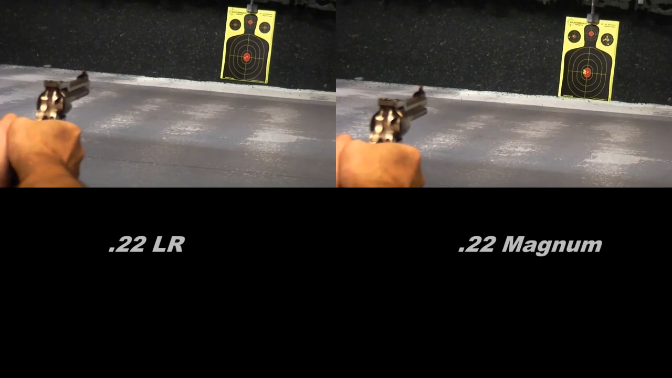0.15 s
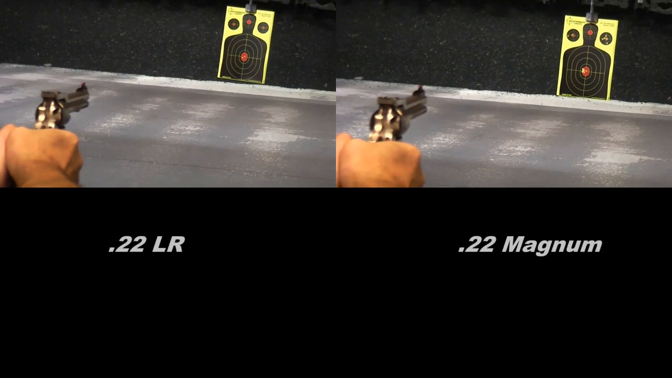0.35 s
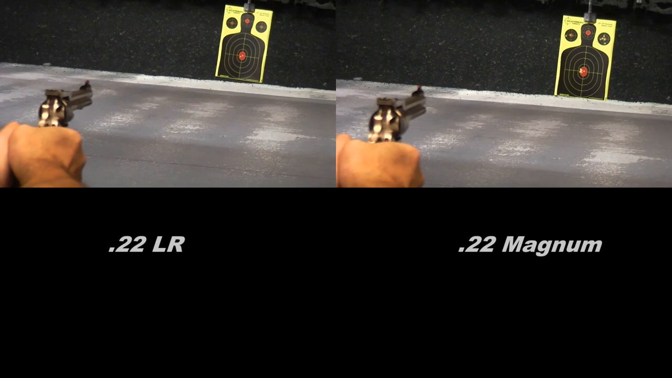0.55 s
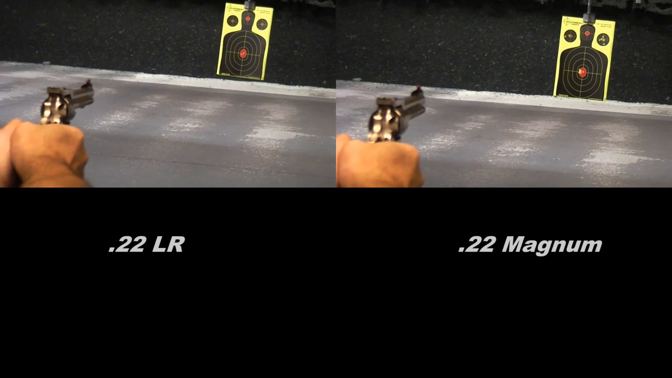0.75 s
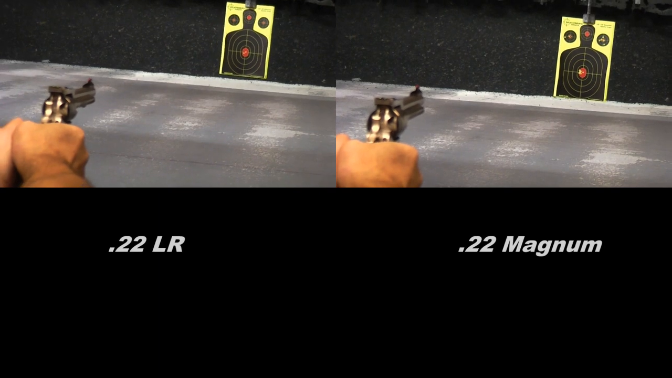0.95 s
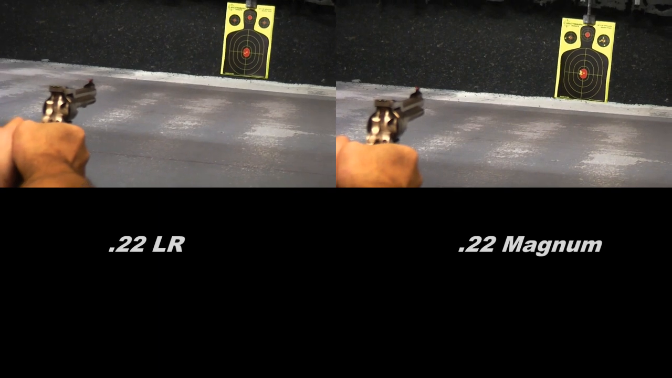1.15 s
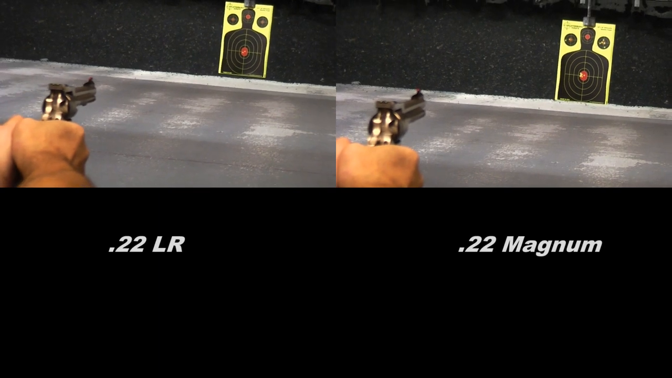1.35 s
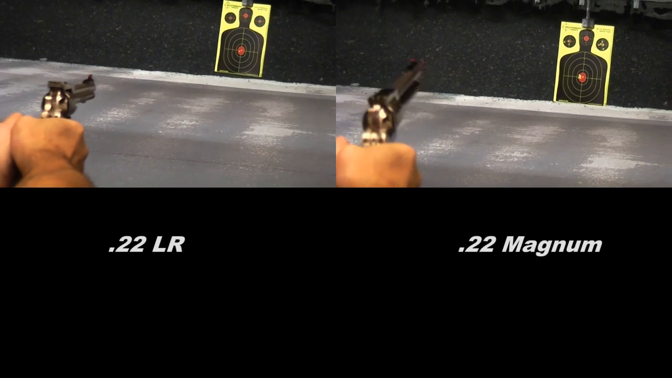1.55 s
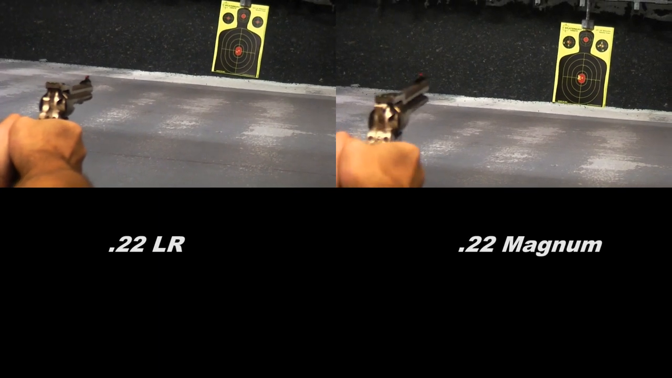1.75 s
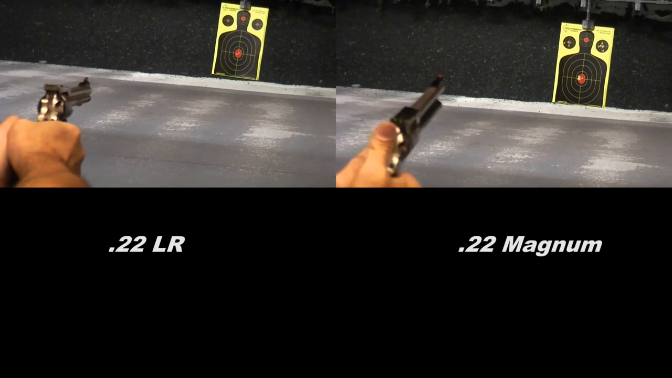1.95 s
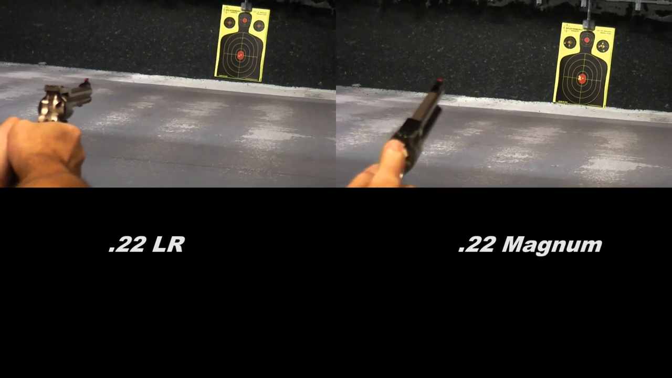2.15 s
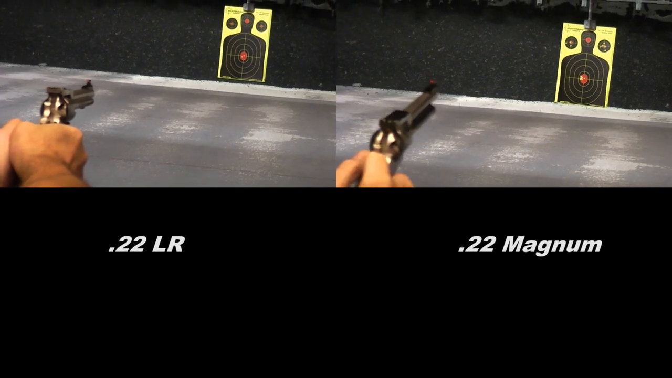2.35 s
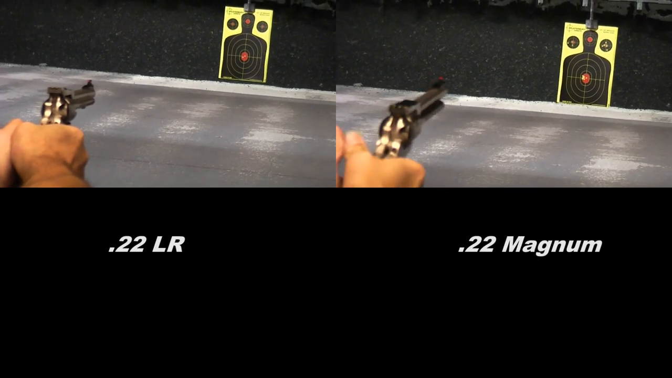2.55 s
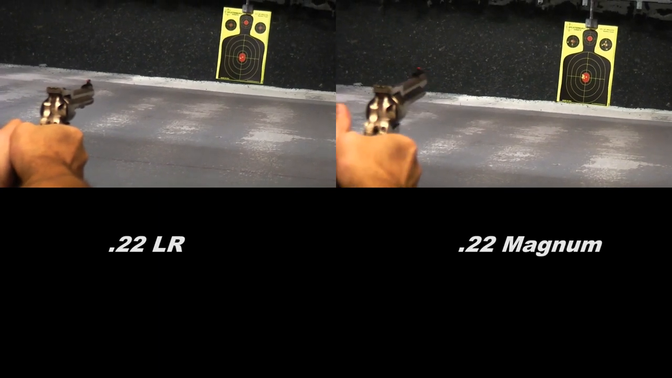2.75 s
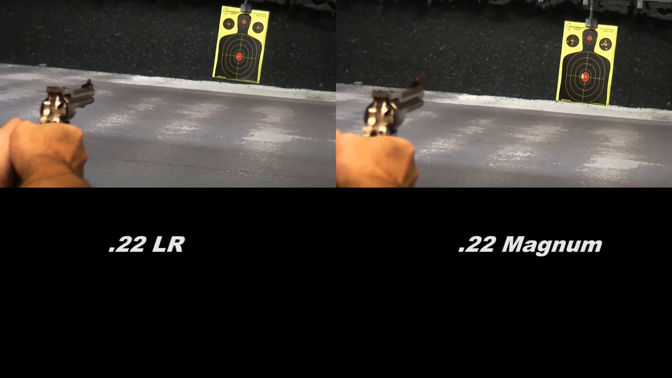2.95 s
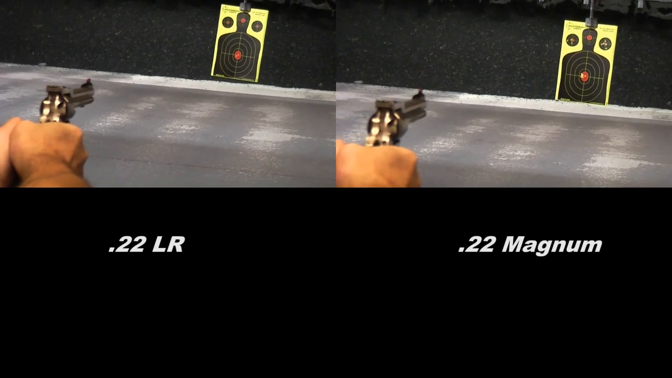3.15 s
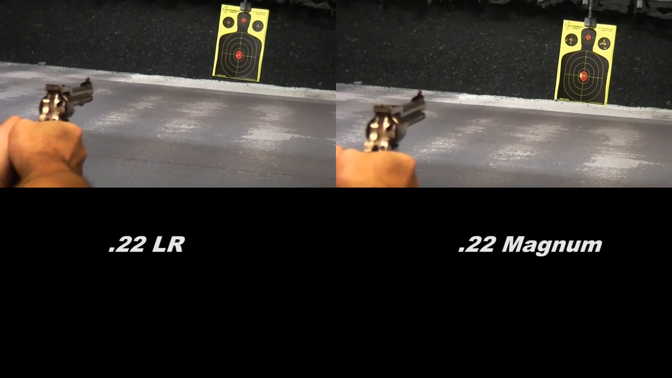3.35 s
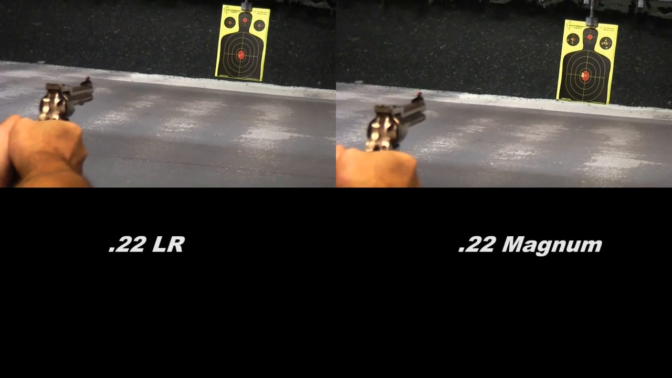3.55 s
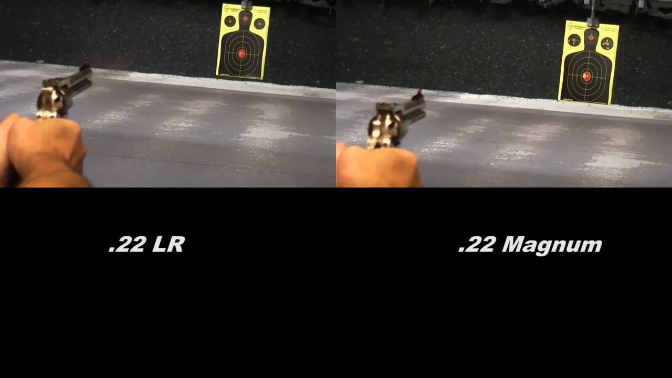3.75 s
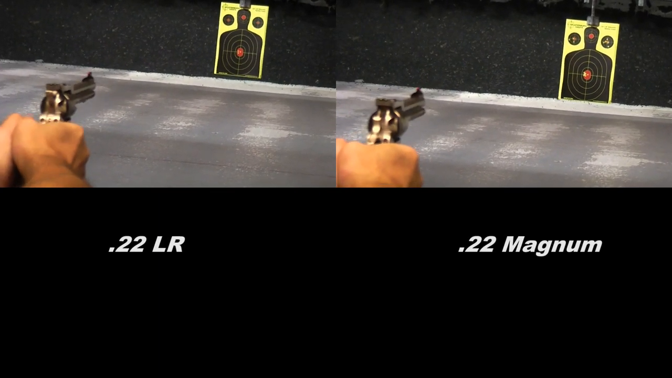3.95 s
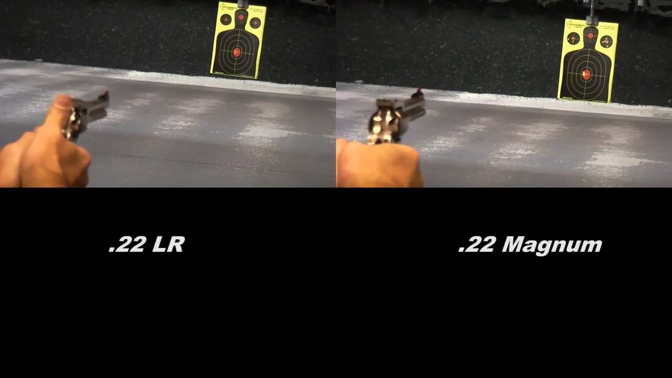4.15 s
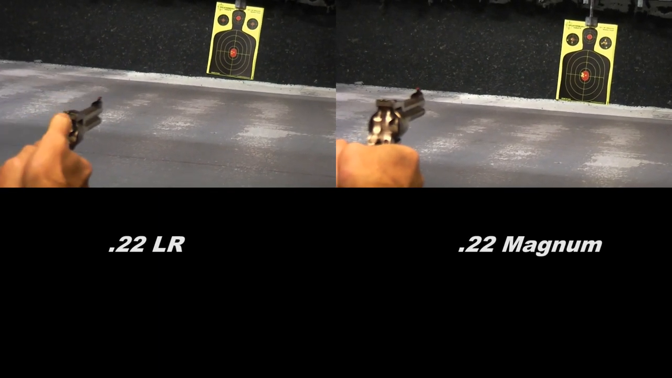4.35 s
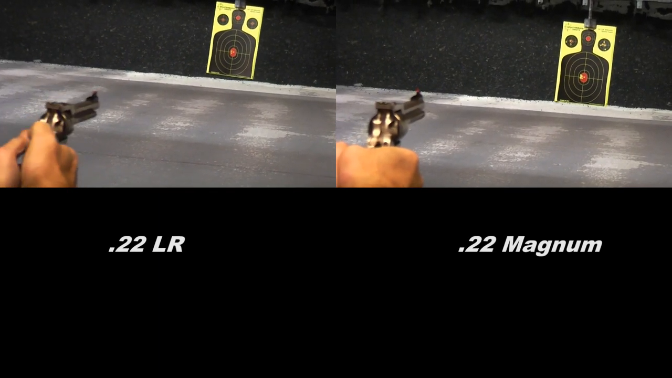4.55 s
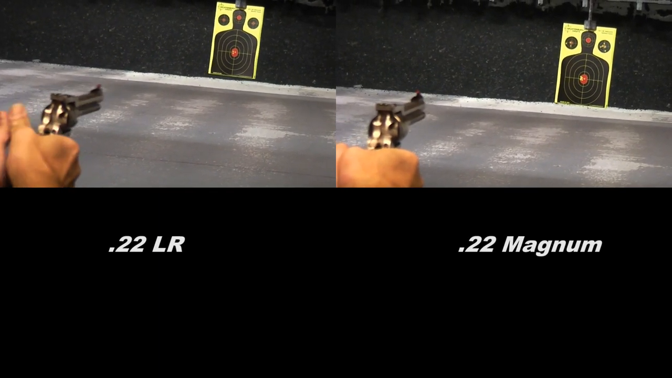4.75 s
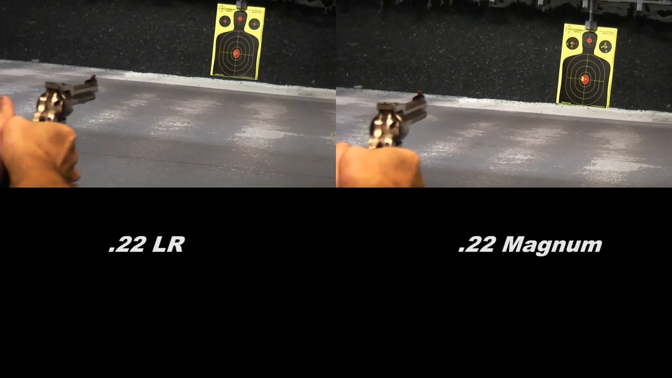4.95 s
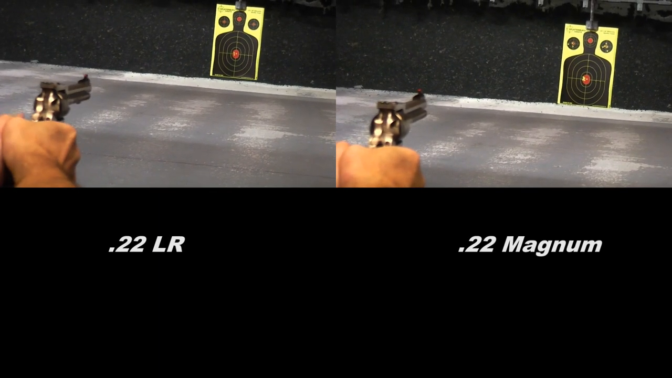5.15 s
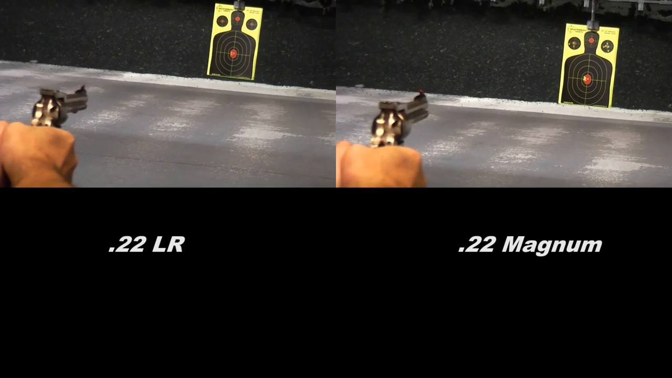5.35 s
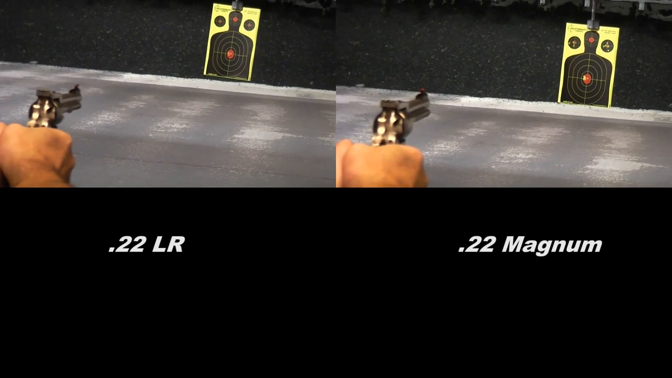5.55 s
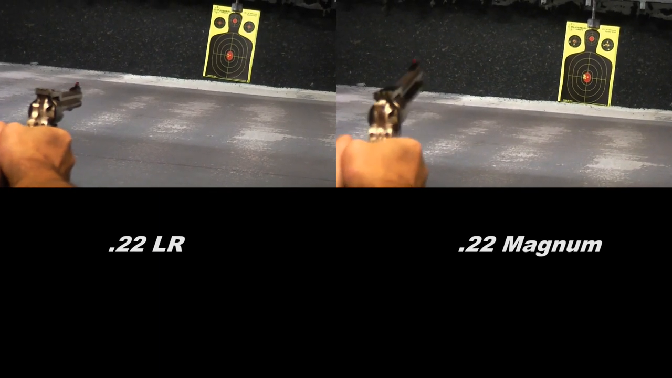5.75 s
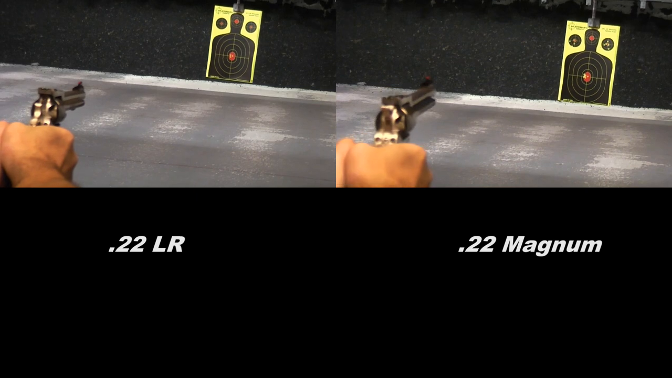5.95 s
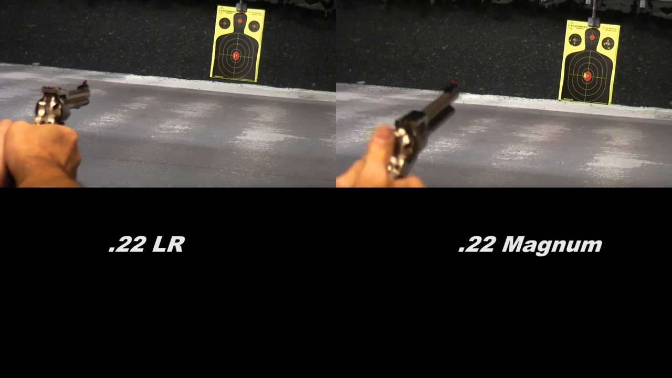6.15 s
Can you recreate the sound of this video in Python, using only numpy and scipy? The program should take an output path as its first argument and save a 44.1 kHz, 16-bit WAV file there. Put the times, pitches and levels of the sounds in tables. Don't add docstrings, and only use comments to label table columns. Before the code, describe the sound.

Loud revolver shots, dull booms mixed with bright cracks, fire unevenly in a hard indoor range, tails overlapping, with metallic clicks between.

```python
import sys
import numpy as np
from scipy import signal
from scipy.io import wavfile
from scipy.ndimage import uniform_filter1d

SR = 44100
rng = np.random.default_rng(int(sys.argv[2]) if len(sys.argv) > 2 else 0)


def amp(db):
    return 10 ** (np.asarray(db, float) / 20)


def write(x):
    x = np.atleast_2d(x).T
    wavfile.write(sys.argv[1], SR, np.round(np.clip(x, -1, 1) * 32767).astype(np.int16))


N = 277385

# (time [s], blast level [dB], gain back after [s], drop at that moment [dB])
FAR_SHOTS = [
    (-.82, -2, .55, 4.5),
    (.613, -2, .55, 3),
    (1.902, -2, .54, 4),
    (3.327, -2, .46, 8),
    (4.808, -2, .44, 5),
    (6.183, -2, .55, 3),
]
NEAR_SHOTS = [
    (1.62, -1, .45, 4),
    (5.794, -1, .5, 3),
]
OTHER_SHOTS = [
    (2.692, -2.5, .535, 8.5),
]
CLOSE_SHOTS = [
    (3.815, -5, .35, 3.5),
]

# (frequency [Hz], density [dB per Hz])
FAR_BLAST = [(18, -53), (30, -23), (410, -5), (467, -2), (532, -4), (606, -1), (1260, -10), (1360, -14),
             (5310, -21), (15500, -44)]
NEAR_BLAST = [(18, -59), (30, -29), (102, -7), (177, -11), (237, 0), (443, -8), (561, -5), (2130, -10),
              (3780, -9), (15500, -32)]
CLOSE_BLAST = [(200, -13), (700, -9), (1500, -5), (2100, -1), (3500, -3), (5900, -6), (15500, -24)]
# (frequency [Hz], density [dB per Hz])
TAIL = [(30, -46), (100, -16), (165, -13), (260, -1), (420, -2), (600, -1), (850, 2), (1100, -3.5),
        (1450, -4.5), (1900, -11), (3000, -12), (5700, -17), (9000, -21), (11500, -29), (14000, -66)]
# (frequency [Hz], T60 [s])
TAIL_T60 = [(60, 2.5), (250, 1.4), (500, 1.3), (1000, 1.5), (3000, 1.33), (6000, 1.05), (11000, .62)]
# (time after blast [s], climb [Hz/s], level [dB])
BOOM = [
    (.004, 13000, 0),
    (.062, 14000, -1),
    (.087, 6500, -4),
    (.145, 6000, -13),
]
# (frequency [Hz], correlation [-1 to 1])
FAR_LIKENESS = [(60, -.1), (180, .05), (320, .85), (600, .86), (1650, .62), (4970, .72), (15000, .4)]
NEAR_LIKENESS = [(60, 0.17), (180, 0.14), (550, 0.55), (1650, 0.54), (4970, 0.59), (15000, 0.27)]
TAIL_LIKENESS = [(60, 0.05), (180, .3), (550, .8), (1650, .72), (4970, .7), (15000, .25)]
# (frequency [Hz], density [dB per Hz])
AIR = [(25, -32), (42, -13), (80, -13), (125, 0), (165, -4), (200, -14), (300, -12), (420, -22), (780, -12),
       (1100, -18), (1600, -31), (3000, -36), (7000, -47), (11000, -66)]
AIR_DB = -43
# (time [s], peak level [dB], centre frequency [Hz], T60 [s])
CLICKS = [(.06, -44, 5000, .15), (.065, -54, 9500, .12), (.315, -46, 4400, .14), (.318, -60, 11500, .12),
          (1.401, -50, 5000, .03), (2.366, -31, 10000, .03), (2.426, -33, 9000, .05),
          (4.42, -35, 7600, .05), (4.572, -34, 3500, .03), (4.645, -37, 9500, .04), (5.26, -43, 11000, .08),
          (5.33, -43, 10000, .08), (5.44, -46, 7000, .06)]
# (time [s], length [s], level [dB])
RATTLE = [
    (4.22, .57, -40.5),
    (5.25, .2, -56),
]
# (frequency [Hz], level [dB], T60 [s])
STEEL = [(1850, 1, .022), (2750, 3, .03), (3300, -2, .02), (4500, -2, .03), (4950, -3, .025),
         (5450, -5, .02), (6400, -4, .02), (7150, -1, .03), (7650, -4, .02), (8600, -6, .012),
         (9500, -6, .01), (11100, -8, .008), (13500, -12, .006)]

EDGES = 28 * 2 ** np.arange(0, 9.3, .4)
CENTRES = np.sqrt(EDGES[:-1] * EDGES[1:])
WHOLE = np.ones((1, len(CENTRES)))

LEAD_S, RING_S = .04, 1.5
BOOM_LOW_HZ, BOOM_TOP_HZ, BOOM_SAG_DB_PER_S = 340, 880, 70
RATTLE_RISE_S, RATTLE_SAG_DB_PER_S, RATTLE_STOP_S = .2, 12, .09
TOP_OPEN_HZ, TOP_SHUT_HZ, TOP_CLOSE_S, TOP_EDGE_HZ = 15800, 9900, .2, 700
DUCK_DB = 5


def rms_one(x):
    return x / np.sqrt(np.mean(x ** 2) + 1e-20)


def filtered(x, order, hz, kind="low"):
    return signal.sosfilt(signal.butter(order, hz, kind, fs=SR, output="sos"), x)


def fade(size, t60):
    return np.exp(np.arange(size, dtype=np.float32) * np.float32(-np.log(1000) / (t60 * SR)))


def at_hz(points, hz):
    points = np.array(points)
    return np.interp(np.log(hz), np.log(points[:, 0]), points[:, 1])


def noise_bank():
    white = rng.standard_normal((2, 2, N // 2 + 1))
    bands = [filtered(white[k % 2], 2, [low, high], "band")
             for k, (low, high) in enumerate(zip(EDGES, EDGES[1:]))]
    return np.stack(bands, axis=1).astype(np.float32)


def coloured(bank, spectrum, likeness, groups):
    alike = np.clip(at_hz(likeness, CENTRES), -1, 1)
    gain = amp(at_hz(spectrum, CENTRES))
    power = np.sum(gain ** 2 * np.diff(EDGES)) / SR * 4
    gain = groups * gain / np.sqrt(power)
    mid = (gain * np.sqrt(1 + alike)).astype(np.float32) @ bank[0]
    side = (gain * np.sqrt(1 - alike)).astype(np.float32) @ bank[1]
    return np.stack([mid + side, mid - side], axis=1)


def tail_bands(bank):
    nodes = np.log(np.array(TAIL_T60)[:, 0])
    shares = np.array([np.interp(np.log(CENTRES), nodes, row) for row in np.eye(len(nodes))])
    return filtered(coloured(bank, TAIL, TAIL_LIKENESS, shares), 2, 11000)


def echoes(blast, tails, blast_t60, tail_db, slap_s, slap_db, swell_s):
    size = int(RING_S * SR)
    start, later = rng.integers(SR // 8, N // 2 - size, 2)
    tail = sum(x[:, later:later + size] * fade(size, t60) for x, (hz, t60) in zip(tails, TAIL_T60))
    tail = tail * (1 - .8 * fade(size, swell_s))
    wash = fade(size, blast_t60)
    back = int((slap_s + LEAD_S) * SR)
    wash[back:] += amp(slap_db) * fade(size - back, blast_t60)
    return blast[0, :, start:start + size] * wash + amp(tail_db) * tail


def boom(size, rough_hz):
    s, climb, db = np.transpose(BOOM)
    t = np.arange(SR // 3) / SR - LEAD_S
    echo = np.maximum(np.searchsorted(s, t) - 1, 0)
    since = np.maximum(t - s[echo], 0)
    hz = np.minimum(BOOM_LOW_HZ + climb[echo] * since, BOOM_TOP_HZ)
    hz = uniform_filter1d(hz, size=200)
    level_db = db[echo] - BOOM_SAG_DB_PER_S * since - 300 * np.maximum(t - .17, 0)
    level_db = uniform_filter1d(level_db, size=200)
    wobble = rms_one(filtered(rng.standard_normal((4, len(t))), 2, rough_hz))
    phase = 2 * np.pi * np.cumsum(hz) / SR + .7 * wobble[0] + .4 * wobble[2:]
    out = np.zeros((2, size))
    out[:, :len(t)] = amp(level_db + 3.5 * wobble[1]) * np.sin(phase)
    return out


def ceiling(x, since):
    hz, s, z = signal.stft(x, SR, nperseg=1024)
    late = np.interp(s, np.arange(len(since)) / SR, since)
    edge = TOP_SHUT_HZ + (TOP_OPEN_HZ - TOP_SHUT_HZ) * np.exp(-late / TOP_CLOSE_S)
    edge = edge + 550 * rng.standard_normal(len(s))
    dull_db = -6 * np.clip((hz[:, None] - 8500) / 5000, 0, 1) * (1 - np.exp(-late / .06))
    cut_db = -40 * np.clip((hz[:, None] - edge) / TOP_EDGE_HZ, 0, 2)
    return signal.istft(z * amp(dull_db + cut_db), SR)[1][:, :x.shape[1]]


def camera(sound, shot, build_s, hold_s, dive_s, dive_db, tops):
    s, blast_db, back_s, drop_db = shot
    t = np.arange(sound.shape[1]) / SR - LEAD_S
    gain_db = np.interp(t, [-LEAD_S, -build_s, 0, hold_s, hold_s + dive_s, back_s, back_s + .06],
                        [-56, -36, 0, 0, -dive_db, 0, -drop_db])
    side_db = np.array([[.3], [-.3]])
    top = np.array(tops)[:, None]
    loud = sound * amp(blast_db + gain_db + side_db) / top
    clipped = top * loud / np.sqrt(np.sqrt(1 + (loud * loud) ** 2))
    clipped = ceiling(clipped, np.maximum(t - .75 * hold_s, 0))
    out = np.zeros((2, N))
    at = round((s - LEAD_S) * SR)
    part = clipped[:, max(-at, 0):N - at]
    out[:, max(at, 0):max(at, 0) + part.shape[1]] = part
    return out


def far_gun(far, near, tails):
    same = echoes(far, tails, blast_t60=.36, tail_db=5.5, slap_s=.1, slap_db=-12, swell_s=.2)
    same = same + amp(3) * boom(same.shape[1], rough_hz=190)
    out = 0
    for shot in FAR_SHOTS:
        change = echoes(near, tails, blast_t60=.45, tail_db=5, slap_s=.098, slap_db=-6, swell_s=.2)
        out = out + camera(same + amp(-11) * change, shot, build_s=.024, hold_s=.05,
                           dive_s=.11, dive_db=9.5, tops=[.45, .35])
    return out


def ventilation(bank):
    air = coloured(bank, AIR, TAIL_LIKENESS, WHOLE)[0]
    return amp(AIR_DB) * np.hstack([air[:, ::-1], air])[:, :N]


def ring(clicks, hz, t60):
    r = amp(-60 / (max(t60, .0005) * SR))
    w = 2 * np.pi * hz / SR
    return signal.lfilter([0, np.sin(w)], [1, -2 * r * np.cos(w), r * r], clicks + 1e-18)


def hammer_clicks():
    size = 4000
    out = np.zeros(N)
    for s, db, hz, t60 in CLICKS:
        burst = rng.standard_normal(size) * fade(size, t60)
        tick = ring(burst, hz, t60=.002)
        at = round(s * SR)
        out[at:at + size] += amp(db) * tick / np.abs(tick).max()
    return out * amp(np.array([[.6], [-.6]]))


def ducked(x, after_s):
    s = min(row[0] for row in FAR_SHOTS if row[0] > after_s)
    return x * amp(np.interp(np.arange(N) / SR - s, [-.015, 0], [0, -DUCK_DB]))


def near_gun(near, tails):
    out = 0
    for shot in NEAR_SHOTS:
        sound = echoes(near, tails, blast_t60=1, tail_db=.5, slap_s=.115, slap_db=-7, swell_s=1.4)
        heard = camera(sound, shot, build_s=.023, hold_s=.12, dive_s=.13, dive_db=6.5, tops=[.42, .38])
        out = out + ducked(heard, shot[0])
    return out


def other_gun(far, tails):
    out = 0
    for shot in OTHER_SHOTS:
        sound = echoes(far, tails, blast_t60=.6, tail_db=7.7, slap_s=.11, slap_db=-9, swell_s=.2)
        sound = sound + amp(3) * boom(sound.shape[1], rough_hz=220)
        out = out + camera(sound, shot, build_s=.018, hold_s=.09, dive_s=.11, dive_db=9, tops=[.5, .36])
    return out


def close_gun(bank, tails):
    crack = coloured(bank, CLOSE_BLAST, NEAR_LIKENESS, WHOLE)
    lane = .45 * tails + .75 * filtered(tails, 1, 500, "high")
    out = 0
    for shot in CLOSE_SHOTS:
        sound = echoes(crack, lane, blast_t60=.6, tail_db=1.5, slap_s=.125, slap_db=-16, swell_s=.6)
        out = out + camera(sound, shot, build_s=.005, hold_s=.04, dive_s=.07, dive_db=6.5, tops=[.4, .36])
    return out


def cylinder_rattle(per_s, hiss_db):
    size = N // 3
    touch = (rng.random((len(STEEL), 2, size)) < per_s / SR) * rng.laplace(size=size)
    rings = 0
    for c, (hz, level_db, t60) in zip(touch, STEEL):
        rings = rings + amp(level_db) * rms_one(ring(c[0] + .6 * c, hz, t60))
    scrape = filtered(rng.standard_normal((2, size)), 2, [1400, 9000], "band")
    steel = rms_one(rings) + amp(hiss_db) * rms_one(scrape)
    out = np.zeros((2, N))
    at = int((RATTLE[0][0] - RATTLE_RISE_S) * SR)
    out[:, at:at + size] = filtered(steel, 8, 14200)
    level = 0
    for s, length, db in RATTLE:
        times = [-3 * RATTLE_RISE_S, 0, length, length + RATTLE_STOP_S]
        levels_db = [db - 60, db, db - RATTLE_SAG_DB_PER_S * length, db - 60]
        level = level + amp(np.interp(np.arange(N) / SR - s, times, levels_db))
    return out * level


def scene():
    bank = noise_bank()
    far = coloured(bank, FAR_BLAST, FAR_LIKENESS, WHOLE)
    near = coloured(bank, NEAR_BLAST, NEAR_LIKENESS, WHOLE)
    tails = tail_bands(bank)
    guns = far_gun(far, near, tails) + near_gun(near, tails) + other_gun(far, tails) + close_gun(bank, tails)
    handling = hammer_clicks() + cylinder_rattle(per_s=800, hiss_db=1.8)
    return guns + handling + ventilation(bank)


def low_pass(x):
    return signal.sosfilt(signal.butter(12, 15730, fs=SR, output="sos"), x)


def record(dry):
    mix = .55 * dry / (.55 ** 6 + dry ** 6) ** (1 / 6)
    mix = filtered(mix, 2, 72, "high")
    mix = mix + .3 * filtered(mix, 1, [2500, 6000], "band")
    return low_pass(mix)


dry = scene()
out = record(dry)
write(out)
```